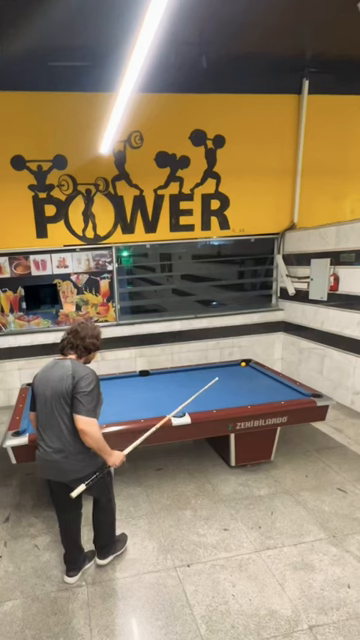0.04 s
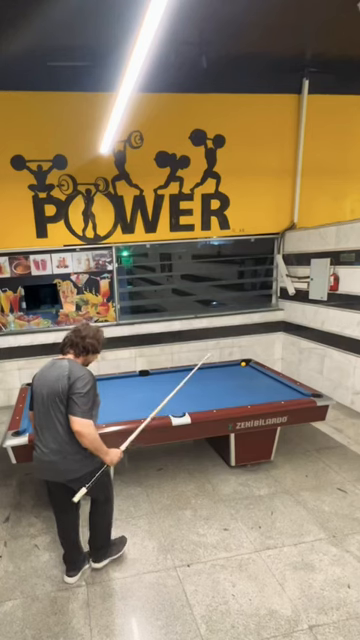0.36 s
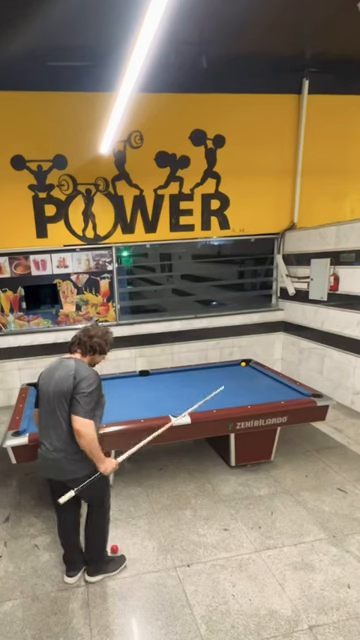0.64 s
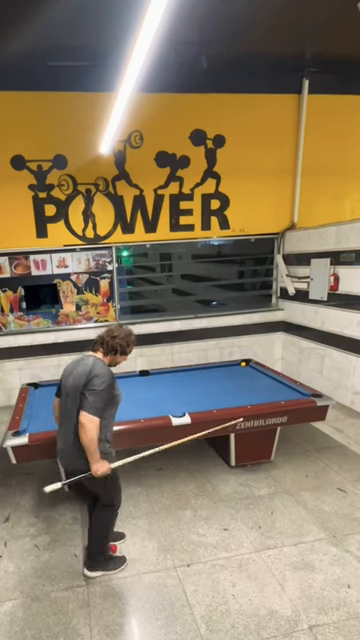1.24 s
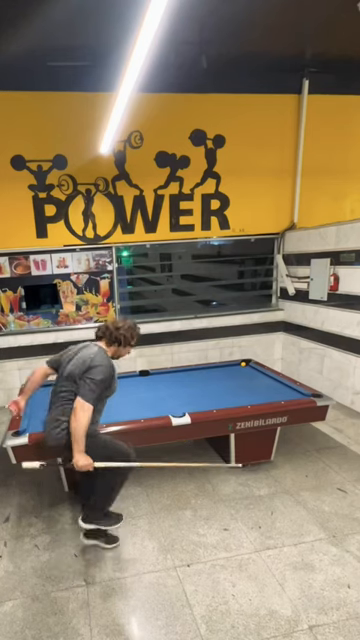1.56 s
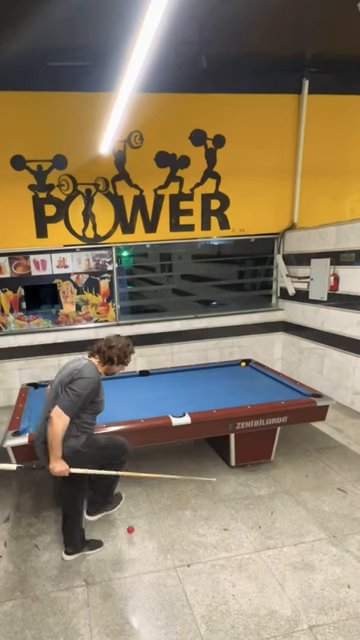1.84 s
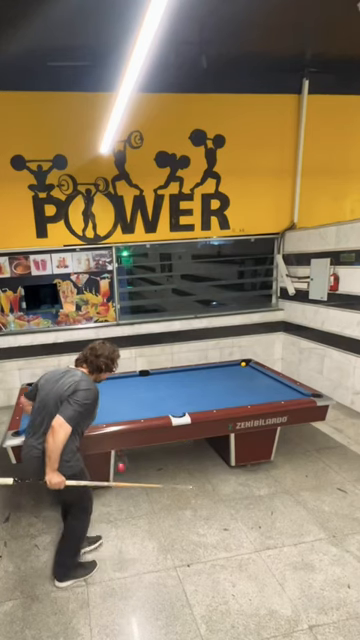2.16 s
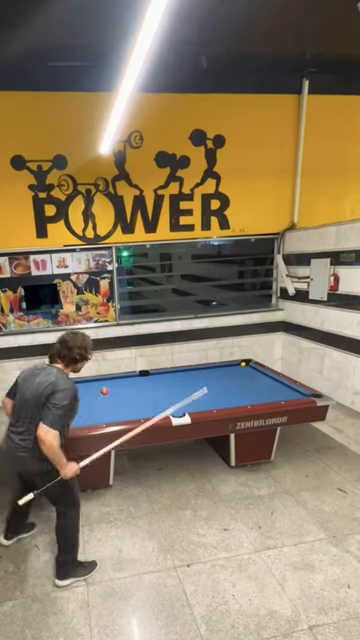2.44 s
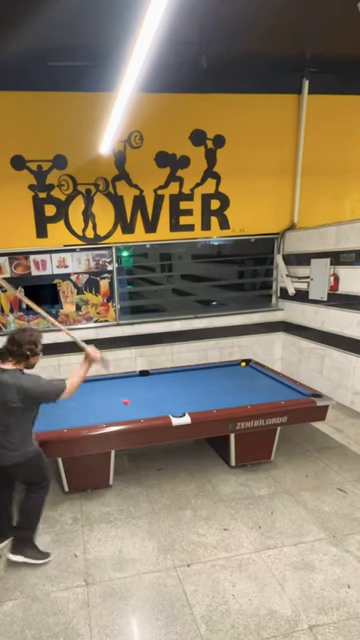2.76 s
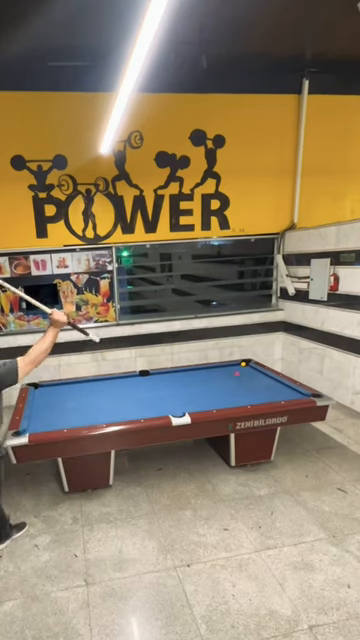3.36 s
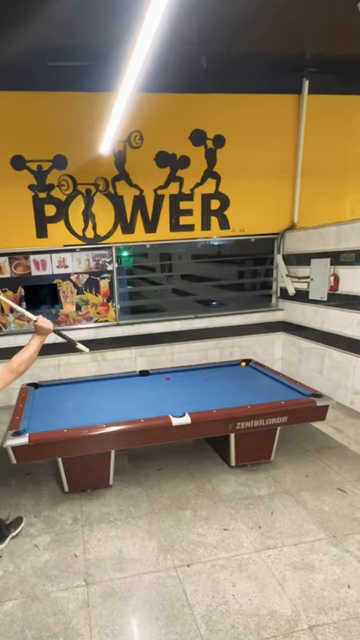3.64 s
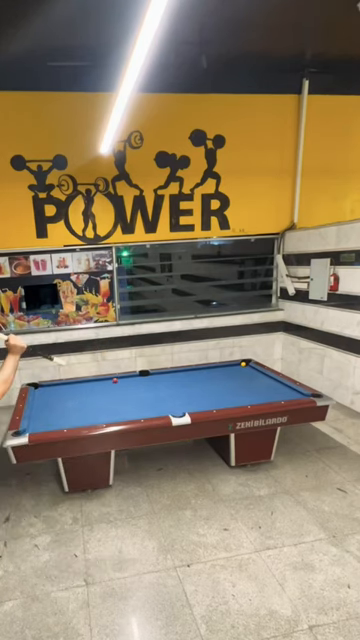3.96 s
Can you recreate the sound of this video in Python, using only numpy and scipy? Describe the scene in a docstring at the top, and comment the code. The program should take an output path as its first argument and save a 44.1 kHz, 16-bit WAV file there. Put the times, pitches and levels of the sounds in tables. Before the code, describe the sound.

A pool ball is played in an echoing tiled hall, where at first only a steady fan hums. At about 2 seconds the ball knocks sharply twice on the stone floor, with a shoe thud in between. Near 2.8 seconds a cue strikes it with a loud, briefly ringing crack. From 3 seconds it lands on the table and bounces between cushions, the duller knocks quickening and fading by 3.9 seconds.

```python
"""A pool ball in a trick shot, heard in a tiled hall through a microphone with two spaced ports.
Flicked by the foot, the ball knocks twice on the stone floor, a shoe thudding between the knocks.
The cue cracks it out of the air and rings; it lands on the table and hops from cushion to cushion.
Hard walls a few metres off answer every blow with distinct echoes and a long tail.
A fan hums behind it all as room tone."""
import sys
import numpy as np
from scipy import signal
from scipy.fft import rfft, irfft
from scipy.io import wavfile
from scipy.ndimage import uniform_filter1d

SR = 44100
rng = np.random.default_rng(int(sys.argv[2]) if len(sys.argv) > 2 else 0)


def int16_out(signal):
    """Quantize to a 16-bit WAV file."""
    q = np.round(np.clip(np.atleast_2d(signal).T, -1, 1) * 32767)
    wavfile.write(sys.argv[1], SR, q.astype(np.int16))


N = 176400
SIZE = 40960  # samples for one blow and its tail
T, F = np.arange(SIZE) / SR, np.fft.rfftfreq(SIZE, 1 / SR)

# fan motor and blade tones (f/Hz, rms level/dB)
FAN_TONES = [(109, -50.5), (205, -55), (332.2, -43.5), (441.4, -59), (554.5, -65), (620, -57), (1035, -66),
             (1238, -65.5), (1330, -63.5), (1447, -59)]
# rush of air (f/Hz, relative level/dB)
AIR_SPECTRUM = [(20, -29.5), (35, -9), (55, -3), (110, 0.5), (160, -5.5), (210, -9), (290, -7.5),
                (400, -10.5), (620, -14), (900, -15.5), (1400, -17), (2000, -21.5), (3200, -29.5),
                (4300, -34), (5500, -32), (6900, -39.5), (7600, -37), (9500, -45.5), (11000, -54.5),
                (14000, -77)]
# ball on stone (t/s, level/dB, hall tail/dB, treble above 6 kHz/dB, body around 700 Hz/dB)
FLOOR_HITS = [(1.9542, 15.5, 3, -9.5, 3), (2.1018, 15, 9.5, 0, -1)]
# colour of a knock (f/Hz, level/dB)
KNOCK_SPECTRUM = [(50, -31.5), (150, -6.5), (400, -3), (1000, -3), (2200, 1.5), (3500, -5.5), (4600, -13),
                  (6000, -20.5), (9000, -23.5), (15000, -25.5)]
# wall echoes of blows on the floor (delay/s, level/dB, left lead/s)
FLOOR_WALLS = [(.0126, 4, .0004), (.0243, -5.5, -.0006), (.0405, -5, 0), (.0542, -8.5, -.0005)]
# shoe on the floor (t/s, level/dB)
SHOE_HITS = [(2.0648, 0), (2.076, 7)]
# colour of the shoe (f/Hz, level/dB)
SHOE_SPECTRUM = [(40, -18), (130, 4.5), (350, 7), (800, -16), (3000, -12), (12000, -33.5)]
# cue on ball (f/Hz, level/dB)
CRACK_SPECTRUM = [(100, -22), (300, -34), (520, -10), (650, -12.5), (850, -6), (1100, -2), (1500, 6.5),
                  (2000, -1), (2300, -3.5), (2900, -4.5), (4000, -13.5), (5300, -9.5), (7500, -16.5),
                  (9000, -12.5), (15000, -24)]
# wall echoes of the crack (delay/s, level/dB, left lead/s)
CRACK_WALLS = [(.0071, 1.5, .0001), (.0121, -19.5, 0), (.0259, 5, .0002), (.0462, -5.5, -.0002),
               (.082, -8, 0), (.097, -28, .0002)]
# modes of the cue (f/Hz, level over the click/dB, t60/s)
CUE_RING = [(480, 10, .3), (850, 6, .15), (1406, 2.5, 0.17), (1570, -8, .2), (1781, -9, .2),
            (2020, -2.5, 0.1), (2450, -16, .2), (2595, -5, .2), (2830, -2, 0.14), (3290, -4, .15),
            (4450, -0.5, .14), (5060, -5.5, .12), (6000, -3, 0.14), (8500, 0, 0.029)]
# ball on cloth and cushions (t/s, level/dB, cut-off/Hz, bass/dB, frame boom/dB, bed thump/dB)
HOPS = [(2.991, 8.5, 1240, -11.5, -11, -13), (3.002, 11, 745, 4, 5, -2), (3.161, 11, 2730, 0.5, 7.5, -13),
        (3.302, 6, 2320, -1.5, -13, -17), (3.532, 13.5, 2440, -0.5, -8, -22),
        (3.675, 5.5, 1900, 3.5, -21, -18), (3.765, -1.5, 1800, 9, -14, -19),
        (3.828, -9, 1600, 13.5, -17, -16), (3.915, -17, 1500, 16.5, -1, -11)]
# colour of a hop (f/Hz, level/dB)
HOP_SPECTRUM = [(40, -24.5), (90, -14), (180, -4), (350, 1.5), (480, 1), (650, 5), (1000, 3.5), (1250, 0.5),
                (1500, -1), (2100, -3), (2900, -8.5), (4000, -17.5), (8000, -29.5), (15000, -37.5)]
# modes of the rails (f/Hz, level over the click/dB, t60/s)
RAIL_RING = [(363, -7.5, 0.1), (655, -7, 0.19), (855, -11, 0.22), (1063, 2, 0.55), (1467, 0.5, 0.27),
             (1450, -1, .25), (1900, 0, .2), (2710, -9, 0.2)]
# wall echoes of the hops (delay/s, level/dB, left lead/s)
TABLE_WALLS = [(.0135, -1, .0004), (.0245, -0.17, -.0005)]
# decay of the hall (f/Hz, t60/s)
HALL_DECAY = [(100, 0.94), (400, 0.74), (1000, 0.96), (2500, 0.92), (5000, 0.93), (8000, 0.56),
              (15000, 0.19)]
# microphone response (f/Hz, level/dB)
MIC_RESPONSE = [(9300, -0.5), (10500, -10), (11400, 2.5), (12500, -2), (13200, -12), (14200, -5),
                (15200, 4)]
# left port minus right port (f/Hz, level/dB)
PORT_BALANCE = [(100, -1.4), (380, -1.5), (700, 0), (1200, 2.5), (2500, .5), (3500, 3.5), (4500, 5),
                (5700, 9.5), (7600, 8), (8700, -2.5), (10000, -1), (12000, -1), (15000, -3)]

PORT_SPACING_M, RIGHT_LEAD_S = .26, .000418  # the direct sound reaches the right port first
SILENCE_S, MIC_TOP_HZ = .035, 15850


def amp(db):
    return 10 ** (np.asarray(db) / 20)


def curve(points, f):
    """Read (f/Hz, value) points on a log-frequency axis."""
    hz, value = np.array(points, float).T
    return np.interp(np.log(f + 1), np.log(hz), value)


def click(db):
    """Spectrum of the tightest causal click with the given gains."""
    cepstrum = irfft(db * np.log(10) / 20)
    cepstrum[1:SIZE // 2] *= 2
    cepstrum[SIZE // 2 + 1:] = 0
    return np.exp(rfft(cepstrum))


def mode(hz, t60):
    """Response of one ringing mode, gain 1 at its centre."""
    s = 2j * np.pi * F
    damping = 2 * np.log(1000) / t60
    return damping * s / (s * s + damping * s + (2 * np.pi * hz) ** 2)


def diffuse(size):
    """Spectra of noise from all around at the two ports: alike in the bass, unrelated above."""
    alike = .96 * np.sinc(2 * np.fft.rfftfreq(size, 1 / SR) * PORT_SPACING_M / 343)
    mid, side = rfft(rng.standard_normal((2, size))) * np.sqrt([(1 + alike) / 2, (1 - alike) / 2])
    return np.array([mid + side, mid - side])


def burst(t60, rise_s):
    """Spectra of dense scatter of unit energy that builds up and dies away."""
    noise = irfft(diffuse(SIZE)) * np.exp(-np.log(1000) * T / t60) * (1 - np.exp(-T / rise_s))
    return rfft(noise / np.sqrt(np.sum(noise ** 2) / 2))


def arrival(delay, left_lead):
    """One path to the two ports."""
    return np.exp(-2j * np.pi * F * (delay + np.array([[-left_lead], [left_lead]]) / 2))


def drift(rate_hz):
    """Slow random drift with a spread near 1."""
    hold = int(SR / rate_hz)
    steps = np.repeat(rng.standard_normal(N // hold + 1), hold)
    return uniform_filter1d(uniform_filter1d(steps, hold), hold)[:N] * np.sqrt(2)


def add(out, start, spectrum):
    """Sound a blow at its time; the last 0.15 s of its tail fade to nothing."""
    i = int(start * SR)
    fade = np.clip((T[-1] - T) / .15, 0, 1) ** 2
    out[:, i:i + SIZE] += (irfft(spectrum) * fade)[:, :N - i]


def fan(drift_hz=.8, waver_db=2.3, right_lead_s=.0002):
    """Room tone: wavering motor and blade tones over a rush of air from all around."""
    air = irfft(diffuse(N) * amp(curve(AIR_SPECTRUM, np.fft.rfftfreq(N, 1 / SR))))
    out = amp(-42.5) * air / air.std()
    for hz, db in FAN_TONES:
        phase = 2 * np.pi * np.cumsum(hz + drift_hz * drift(7)) / SR
        lead = np.array([[0], [2 * np.pi * hz * right_lead_s]])
        out += np.sqrt(2) * amp(db + waver_db * drift(9)) * np.sin(phase + lead)
    return out * amp([[1], [-1]])  # 2 dB louder on the left


def floor_knocks():
    """The hard ball clicks twice on stone; the second knock is brighter and wakes more of the hall."""
    out = np.zeros((2, N))
    for start, db, tail_db, treble_db, body_db in FLOOR_HITS:
        tone = curve([(200, 0), (700, body_db), (1800, 0), (4000, .011), (6000, treble_db)], F)
        contact = click(db + curve(KNOCK_SPECTRUM, F) + tone)
        add(out, start, contact * hall(FLOOR_WALLS, tail_db, build_s=.013))
    return out


def hall(echoes, tail_db, build_s, direct_db=1, decay_share=1):
    """Blow to microphone: direct path, nearby scatter, duller echoes, a tail whose treble dies first."""
    noise, tail = diffuse(SIZE), 0
    octaves_hz = 125 * 2. ** np.arange(8)
    for hz, pick in zip(octaves_hz, np.eye(len(octaves_hz))):
        band = irfft(noise * curve(list(zip(octaves_hz, pick)), F))
        t60 = decay_share * curve(HALL_DECAY, hz)
        tail = tail + band * np.exp(-np.log(1000) * T / t60)
    early_lift = 1 + .85 * np.exp(-T / .024)
    tail = tail * (1 - np.exp(-T / build_s)) * early_lift
    tail = rfft(tail / np.sqrt(np.sum(tail ** 2) / 2))
    walls = sum(amp(db) * arrival(delay, lead) for delay, db, lead in echoes)
    walls /= 1 + 1j * F / 2000  # duller above 2 kHz
    high_pass = 1j * F / (1990 + 1j * F)
    scatter = amp(2) * burst(t60=.014, rise_s=.00033) * high_pass
    direct = arrival(RIGHT_LEAD_S / 2, -RIGHT_LEAD_S) + scatter
    return amp(direct_db) * direct + walls + amp(tail_db) * tail


def shoe_thud():
    """A shoe meets the floor in two soft, quick touches."""
    out = np.zeros((2, N))
    for start, db in SHOE_HITS:
        contact = click(db + curve(SHOE_SPECTRUM, F))
        add(out, start, contact * hall(FLOOR_WALLS, tail_db=6, build_s=.013))
    return out


def cue_crack(start=2.7764, gain_db=18.5):
    """The shaft slaps the ball and rings briefly; its bending waves run ahead in the treble."""
    out = np.zeros((2, N))
    travel_s = .0005  # along the shaft at 1 kHz
    bending = np.exp(-4j * np.pi * travel_s * np.sqrt(F * 1000))
    contact = click(gain_db + curve(CRACK_SPECTRUM, F)) * bending
    ring = 1 + sum(amp(db) * mode(hz, t60) for hz, db, t60 in CUE_RING)
    room = hall(CRACK_WALLS, tail_db=6.5, build_s=.012, direct_db=0, decay_share=.91)
    add(out, start, contact * ring * room)
    return out


def table_hops():
    """Cloth and rubber dull each blow; rails shudder and ring, the wood frame booms, the slate thumps."""
    out = np.zeros((2, N))
    ring = 1 + sum(amp(db) * mode(hz, t60) for hz, db, t60 in RAIL_RING)
    frame, bed = mode(hz=284.5, t60=.078), mode(hz=202, t60=.045)
    for start, db, cut_hz, bass_db, boom_db, thump_db in HOPS:
        bass_shelf = curve([(250, bass_db), (600, 0)], F)
        treble_loss = 10 * np.log10(1 + (F / cut_hz) ** 4)
        contact = click(db + curve(HOP_SPECTRUM, F) + bass_shelf - treble_loss)
        body = ring + amp(boom_db) * frame + amp(thump_db) * bed
        shudder = amp(8.5) * burst(t60=.14, rise_s=.03)
        room = hall(TABLE_WALLS, tail_db=11, build_s=.0044, direct_db=0)
        add(out, start, contact * body * (shudder + room))
    return out


def scene():
    """The shot from floor to table, over the fan, as it reaches the microphone."""
    return floor_knocks() + shoe_thud() + cue_crack() + table_hops() + fan()


def record(dry):
    """A brief silence comes first; each port adds its own colour, peaks are rounded and the top is cut."""
    response, balance = curve(MIC_RESPONSE, F), curve(PORT_BALANCE, F)
    ports = np.array([irfft(click(response + side * balance / 2)) for side in (1, -1)])
    coloured = signal.fftconvolve(dry, ports[:, :SIZE // 32], axes=1)[:, :N]
    rounded = np.tanh(.8 * coloured) / .8
    is_sounding = np.arange(N) > SILENCE_S * SR
    top_cut = signal.ellip(10, .2, 80, MIC_TOP_HZ, fs=SR, output="sos")
    return signal.sosfilt(top_cut, rounded * is_sounding)


dry = scene()
out = record(dry)
int16_out(out)
```